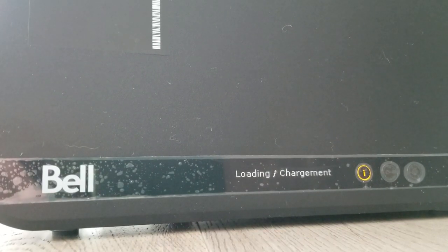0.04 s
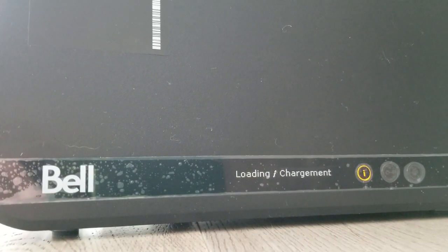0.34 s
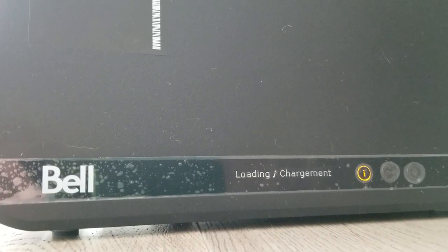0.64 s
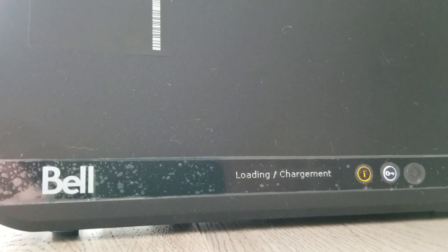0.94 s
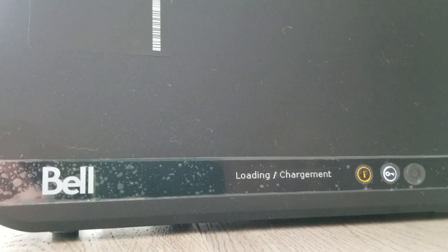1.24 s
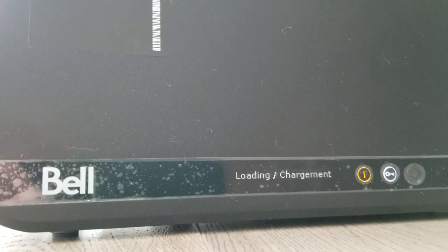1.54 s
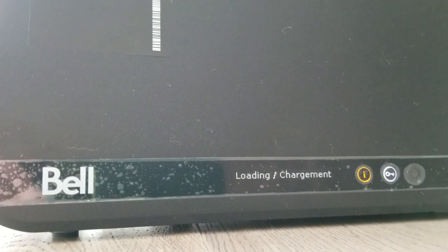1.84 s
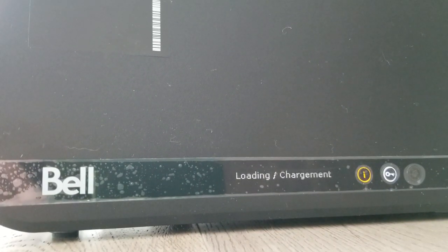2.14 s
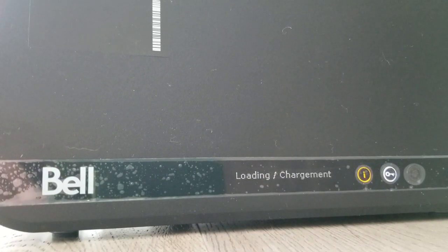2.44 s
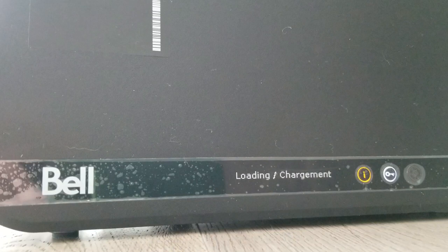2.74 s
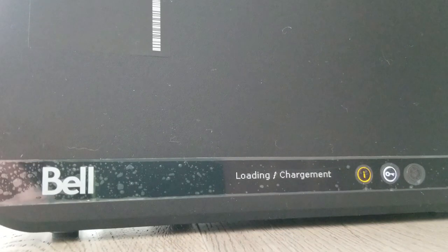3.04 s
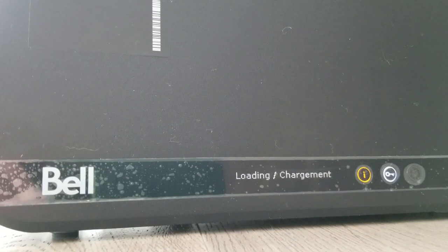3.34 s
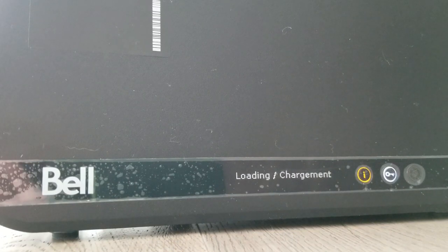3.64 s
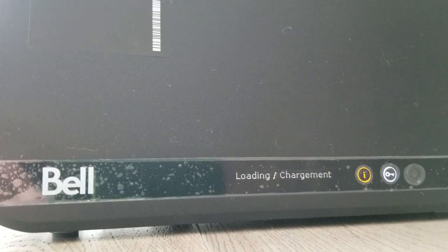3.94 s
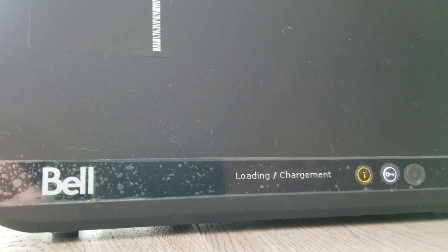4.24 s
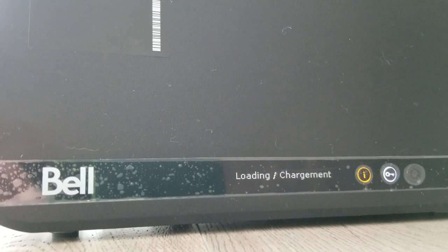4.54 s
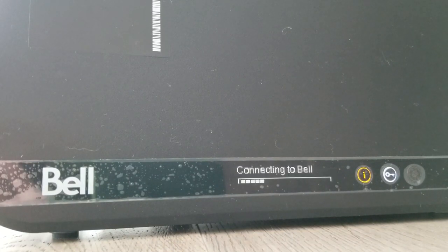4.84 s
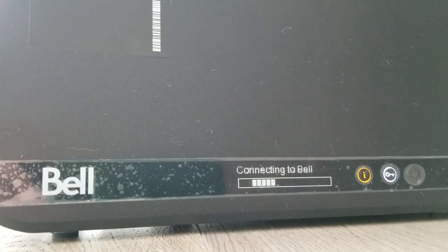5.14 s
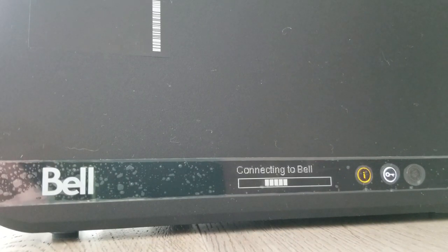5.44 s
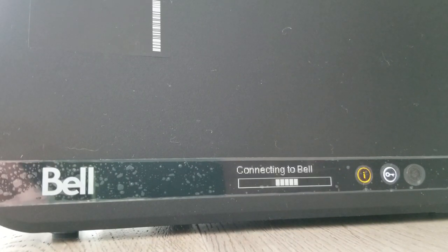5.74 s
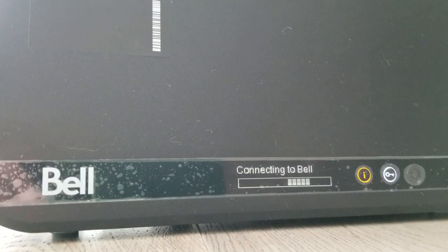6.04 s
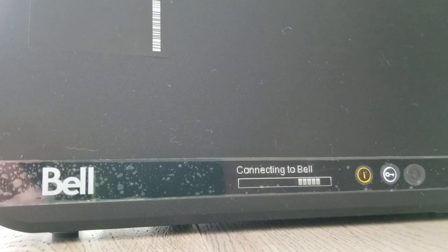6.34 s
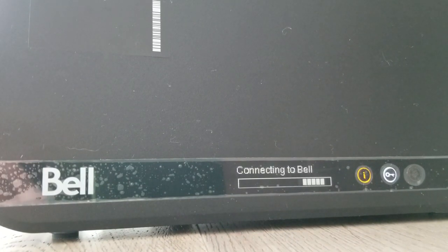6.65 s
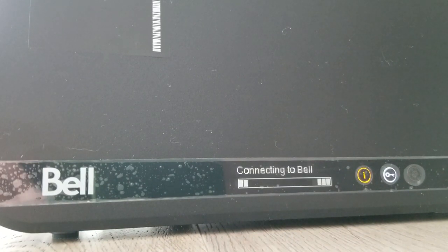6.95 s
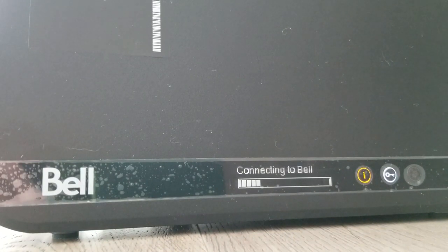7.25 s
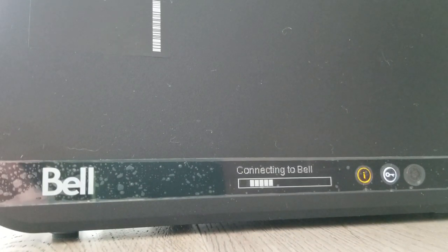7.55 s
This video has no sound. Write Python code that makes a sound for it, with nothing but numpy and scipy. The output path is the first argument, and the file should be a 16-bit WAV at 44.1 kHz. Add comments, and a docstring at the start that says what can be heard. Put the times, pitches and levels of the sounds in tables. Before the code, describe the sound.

Dull, low footsteps thump through a building from another room, over a faint steady hum and hiss.

```python
"""Footsteps through a building

Someone walks in another part of a building, heard from a quiet room. Heel, sole and toes drive the
low modes of a wooden floor, which boom through the structure; a duller knock spreads through the
walls and decays. A joint creaks faintly under heavier steps, over a motor's hum and a thin hiss."""
import sys
import numpy as np
from scipy import signal
from scipy.fft import rfft, irfft
from scipy.io import wavfile
from scipy.ndimage import uniform_filter1d

SR = 44100
rng = np.random.default_rng(int(sys.argv[2]) if len(sys.argv) > 2 else 0)


def int16_out(signal):
    """Quantize to a 16-bit WAV file."""
    q = np.round(np.clip(np.atleast_2d(signal).T, -1, 1) * 32767)
    wavfile.write(sys.argv[1], SR, q.astype(np.int16))


N = 335160


def from_db(db):
    """Amplitude ratio of a level in decibels."""
    return 10 ** (np.asarray(db) / 20)


def unit_rms(x):
    """Normalisation to unit mean power."""
    return x / np.sqrt(np.mean(x ** 2) + 1e-30)


def at_hz(table, hz):
    """Linear interpolation on a log-frequency axis."""
    table_hz, values = np.array(table).T
    return np.interp(np.log(hz), np.log(table_hz), values)


def mode(force, hz, t60):
    """Damped harmonic oscillator: a unit impulse starts a decaying sine of amplitude 1."""
    radius, angle = from_db(-60 / (t60 * SR)), 2 * np.pi * hz / SR
    return signal.lfilter([0, np.sin(angle)], [1, -2 * radius * np.cos(angle), radius ** 2], force + 1e-18)


def stereo_spectra(correlation, hz):
    """Partial coherence: sum and difference of two noises set the left-right correlation."""
    mid, side = rfft(rng.standard_normal((2, N)))
    alike = np.clip(at_hz(correlation, hz), -1, 1)
    return np.sqrt(1 + alike) * mid + np.sqrt(1 - alike) * side * [[1], [-1]]


# Spectral density of the room noise: f/Hz, relative level/dB
ROOM_SPECTRUM = [(20, -3), (32, 3), (45, -1.5), (65, 6), (110, 1), (150, -8.5), (220, -13.5), (330, -21.5),
                 (560, -27), (800, -26.5), (1200, -29.5), (3000, -30), (8500, -33), (12500, -30)]
# Coherence of the room noise: f/Hz, left-right correlation
ROOM_CORRELATION = [(30, 0.99), (130, 0.9), (260, 0.65), (500, 0.16), (1000, 0.05), (3000, -0.1),
                    (15000, -0.033)]
# Partials of a distant motor: f/Hz, level/dB
MOTOR_LINES = [(75.4, -77.5), (231, -89.5), (466, -101)]

def still_room(noise_db=-63.5, leak_hz=14):
    """Superposition: a continuous spectrum of building rumble and hiss, and a motor's line spectrum."""
    hz, t = np.maximum(np.fft.rfftfreq(N, 1 / SR), 1), np.arange(N) / SR
    colour = from_db(at_hz(ROOM_SPECTRUM, hz)) * hz ** 2 / (hz ** 2 + leak_hz ** 2)
    noise = unit_rms(irfft(stereo_spectra(ROOM_CORRELATION, hz) * colour, N))
    hum = sum(from_db(db) * unit_rms(np.sin(2 * np.pi * (line_hz * t + rng.random())))
              for line_hz, db in MOTOR_LINES)
    return from_db(noise_db) * noise + hum


# Creaks of a joint: t/s, level/dB
CREAKS = [(2.228, -82), (2.84, -89)]

def joint_creaks(hz=2205, t60=0.07, sigma_s=0.026):
    """Frictional excitation: a joint rubs briefly and sounds one narrow resonance."""
    t = np.arange(N) / SR
    envelope = sum(from_db(db) * np.exp(-0.5 * ((t - at_s) / sigma_s) ** 2) for at_s, db in CREAKS)
    return envelope * unit_rms(mode(rng.standard_normal((2, N)), hz, t60))


def add(track, at_s, sound):
    """Superposition of a sound on a track at a given time."""
    start = max(round(at_s * SR), 0)
    track[start:start + len(sound)] += sound[:N - start]


def swell(age, rise_s, t60, direct, attack_s=0.0066):
    """Reverberation: a direct share arrives first, reflections build up, then all decays exponentially."""
    reflected = (1 - direct) * np.clip(age / rise_s, 0, 1)
    decay = from_db(-60 * np.maximum(age - rise_s, 0) / t60)
    return np.clip(age / attack_s, 0, 1) * (direct + reflected) * decay


FIRM_STEP_DB = -28.5   # boom level of a firm step
# Footfalls, which drive both walls and floor: t/s, boom level/dB, board f/Hz under the heel,
# sole delay/s, sole level/dB re heel, board f/Hz under the sole, relative knock level/dB,
# knock tilt/(dB per octave)
STEPS = [(0.167, -44, 115, 0.0186, -1.5, 150, -58, -3), (0.967, -37, 54.4, 0.056, -6.5, 46.6, -60, 1.5),
         (1.617, -29.5, 66.7, 0.035, -7, 42.6, -54, -1.5), (1.877, -42.5, 135, 0.025, 1.5, 108, -59, -1),
         (2.132, -26.5, 90, 0.035, -2.5, 61.6, -48, -1), (2.616, -23.5, 110, 0.0525, -2, 71.3, -50.5, -3),
         (3.073, -30, 92, 0.017, 4.5, 85, -51.5, -8), (3.579, -23, 54.4, 0.03, 7.5, 83.4, -46.5, -4),
         (3.814, -43.5, 87.5, 0.033, -18, 77, -67, 0), (4.066, -29.5, 94, 0.027, 2.5, 86, -43, 0.5),
         (4.479, -52, 76, 0.028, -2.5, 73.7, -76, 4), (4.668, -33, 49.7, 0.039, -3, 77, -45, 0),
         (5.246, -46, 50, 0.06, -16, 62, -76, -1), (5.374, -51, 98, 0.025, 0.5, 83.6, -70.5, -6),
         (5.677, -42.5, 50.9, 0.051, -10, 70.8, -65.5, 1.5),
         (6.87, -29.5, 49.5, 0.023, 2, 67.7, -52.5, 0.5)]
# Spectral density of the dense wall modes: f/Hz, relative level/dB
WALL_SPECTRUM = [(90, -5.5), (122, 5), (165, 1), (200, -7.5), (255, -13), (330, -16), (420, -24),
                 (520, -26.5), (620, -38.5), (800, -37.5), (1050, -52.5), (1400, -53.5)]
# Prominent panel resonances: f/Hz, width/Hz, gain/dB
WALL_PANELS = [(202, 4.9, 7.5), (232.9, 9, 10), (270.4, 8, 10.5), (324, 8.7, 5.5), (462.3, 11.2, 12),
               (528, 8.8, 0), (900, 50, 6.5)]
# Decay of the wall modes: f/Hz, T60/s
WALL_DECAY = [(120, 0.47), (250, 0.65), (500, 0.49), (900, 0.89)]
# Coherence of the knock: f/Hz, left-right correlation
WALL_CORRELATION = [(130, 0.91), (260, 0.92), (500, 0.29), (1200, 0.13)]

def wall_knocks(gain_db=-22, lead_s=0.0087, firm_rise_s=0.054, heel_share=0.3, pivot_hz=230):
    """Modal overlap: each step excites the dense wall modes, which merge into noise decaying by bands."""
    out, age = np.zeros((2, N)), np.arange(SR) / SR
    hz = np.maximum(np.fft.rfftfreq(N, 1 / SR), 1)
    panels_db = sum(db / (1 + (2 * (hz - centre) / width) ** 2) for centre, width, db in WALL_PANELS)
    colour = from_db(at_hz(WALL_SPECTRUM, hz) + panels_db)
    field = stereo_spectra(WALL_CORRELATION, hz) * colour * np.sqrt(SR) / 2
    for band_hz in 100 * 2 ** (np.arange(9) / 2):
        envelope, t60 = np.zeros(N), at_hz(WALL_DECAY, band_hz)
        for at_s, boom_db, _, _, sole_db, _, knock_db, tilt in STEPS:
            rise_s = firm_rise_s * 2 ** ((boom_db - FIRM_STEP_DB) / 25.5)   # lighter steps peak sooner
            direct = heel_share / (1 + from_db(sole_db) ** 2)   # a step on the sole starts more softly
            gain = from_db(knock_db + tilt * np.log2(band_hz / pivot_hz))
            add(envelope, at_s - lead_s, gain * swell(age, rise_s, t60, direct))
        half_octave = np.maximum(1 - 2 * np.abs(np.log2(hz / band_hz)), 0)
        out += envelope * irfft(field * half_octave, N)
    return from_db(gain_db) * out


def contact_force(age, hardness_hz=200):
    """Cushioned impact: the harder the contact, the shorter the force pulse."""
    scaled_age = np.maximum(age, 0) * 2 * np.pi * hardness_hz
    return scaled_age * np.exp(-scaled_age)


def board(force, hz, q):
    """Resonant transmission: the boards underfoot pass a band around their natural frequency."""
    return signal.lfilter(*signal.iirpeak(hz, max(q, 0.5), fs=SR), force)


# Low modes of floor and room together: f/Hz, relative level/dB, T60/s
FLOOR_MODES = [(31.43, -6, 1), (52.3, -2.5, 0.22), (62, -2.5, 0.61), (75.27, -2.5, 0.47), (92.1, -7, 0.32),
               (95.9, 1, 0.38), (116.4, -14, 0.78), (131.6, -8, 0.35), (142.2, -6.5, 0.45),
               (158.05, -9.5, 0.77), (197.4, -18, 0.47), (237, -19, 0.39), (272, -18, 0.48)]

def floor_booms(firm_q=2.58, toe_lag_s=0.085, toe_db=-12.5, leak_hz=30):
    """Modal response: heel, sole and toes bend the boards in turn and set floor and room ringing."""
    out, age = np.zeros(N), np.arange(SR) / SR
    leak = signal.butter(2, leak_hz, "high", fs=SR, output="sos")   # slow pressure swings leave the room
    for at_s, boom_db, heel_hz, sole_delay_s, sole_db, sole_hz, *_ in STEPS:
        q = firm_q * 2 ** ((FIRM_STEP_DB - boom_db) / 21)   # lighter steps damp the boards less
        heel = contact_force(age)
        sole = from_db(sole_db) * contact_force(age - sole_delay_s)
        toes = from_db(toe_db) * contact_force(age - sole_delay_s - toe_lag_s)
        force = board(heel, heel_hz, q) + board(sole + toes, sole_hz, q)
        ringing = sum(from_db(db) * mode(force, hz, t60) for hz, db, t60 in FLOOR_MODES)
        boom = signal.sosfilt(leak, ringing)
        add(out, at_s, -from_db(boom_db) * boom / np.abs(boom).max())
    return out


def scene(steps_pan_db=0.74, room_pan_db=0.43):
    """Interaural level difference: steps and room are both a little stronger on the left."""
    leftward = np.array([[1], [-1]])
    steps = floor_booms() + wall_knocks() + joint_creaks()
    return steps * from_db(steps_pan_db * leftward) + still_room() * from_db(room_pan_db * leftward)


def record(dry, depth_db=1.83, threshold_db=-46, cutoff_hz=15750):
    """Downward expansion, then a steep low-pass: quiet stretches sink, so hiss lifts with each thump."""
    power = uniform_filter1d(dry.mean(axis=0) ** 2, size=2200)   # 50 ms average
    quietness = 1 / (1 + power / from_db(threshold_db) ** 2)
    low_pass = signal.ellip(12, 0.1, 70, cutoff_hz, fs=SR, output="sos")
    return signal.sosfilt(low_pass, dry * from_db(-depth_db * quietness))


dry = scene()
out = record(dry)
int16_out(out)
```